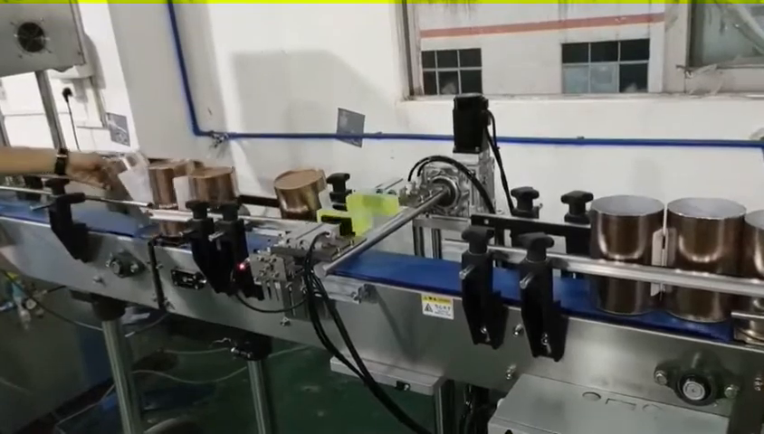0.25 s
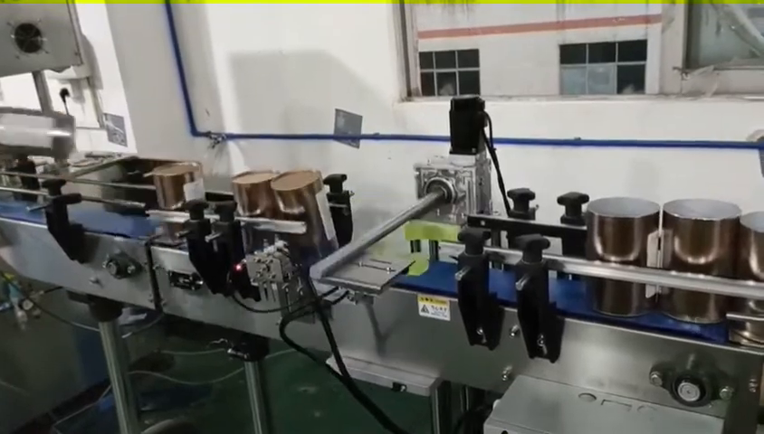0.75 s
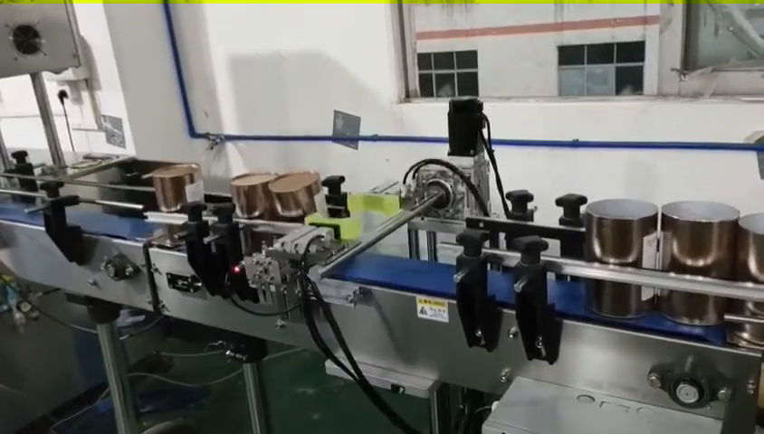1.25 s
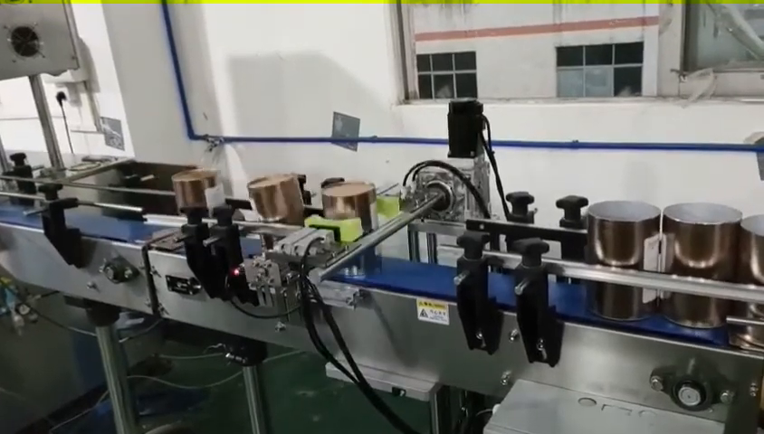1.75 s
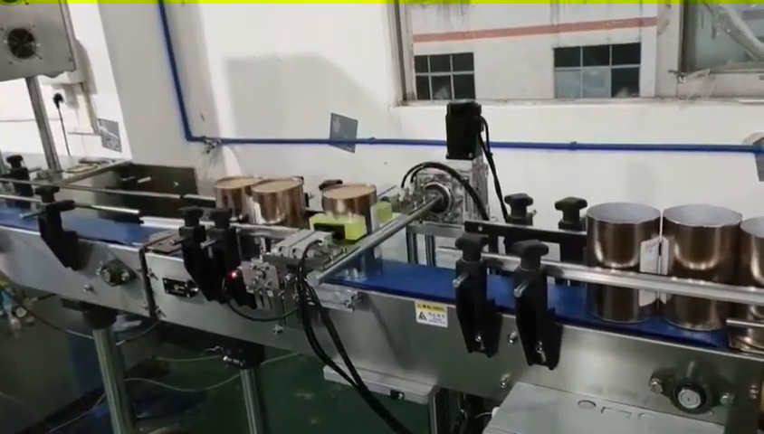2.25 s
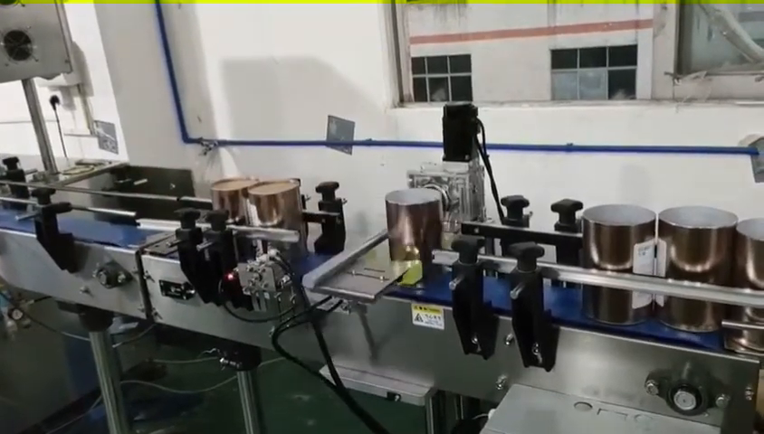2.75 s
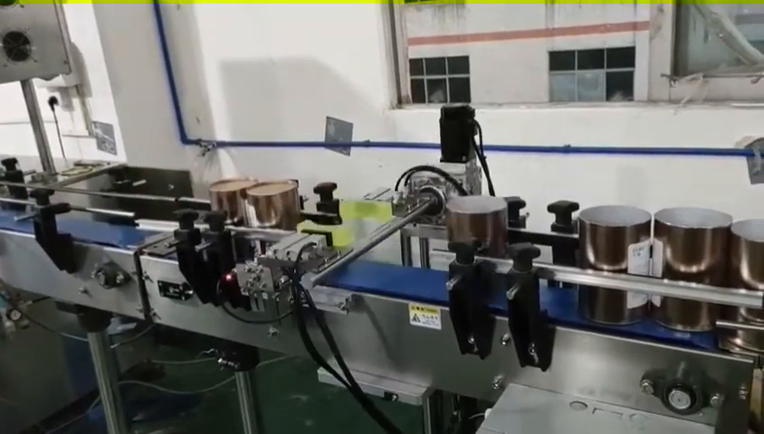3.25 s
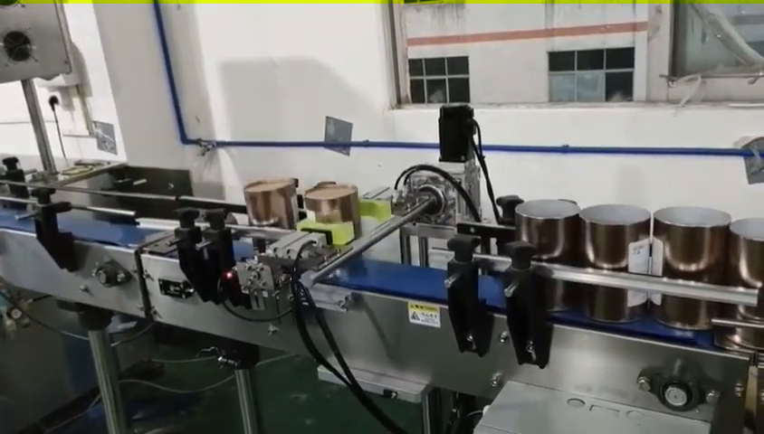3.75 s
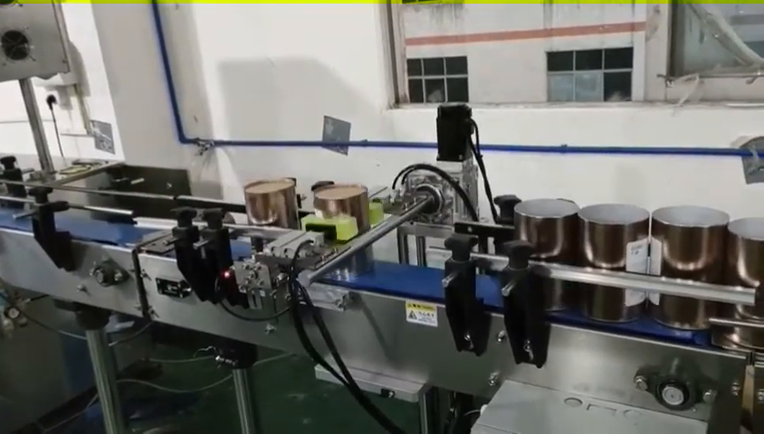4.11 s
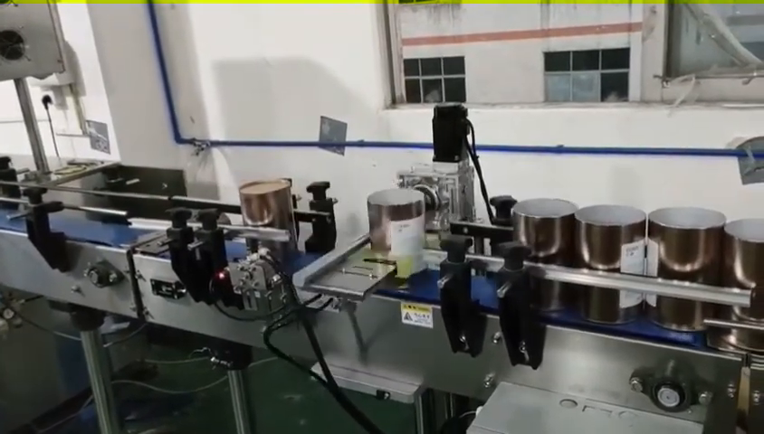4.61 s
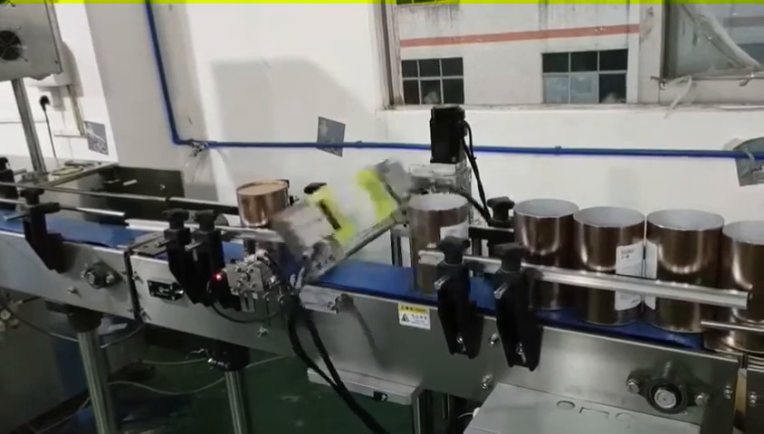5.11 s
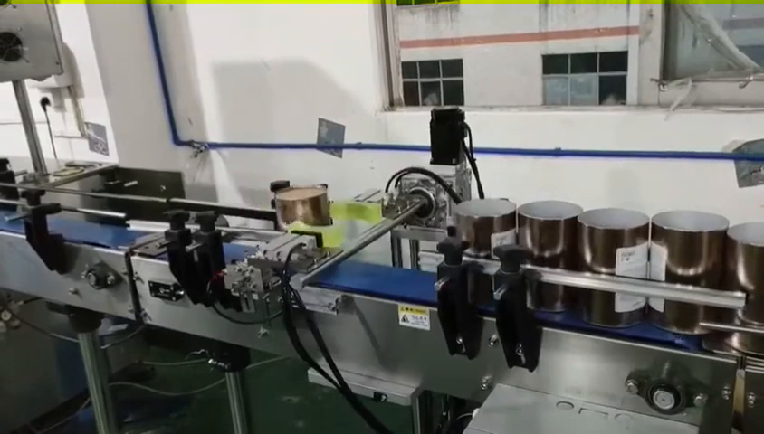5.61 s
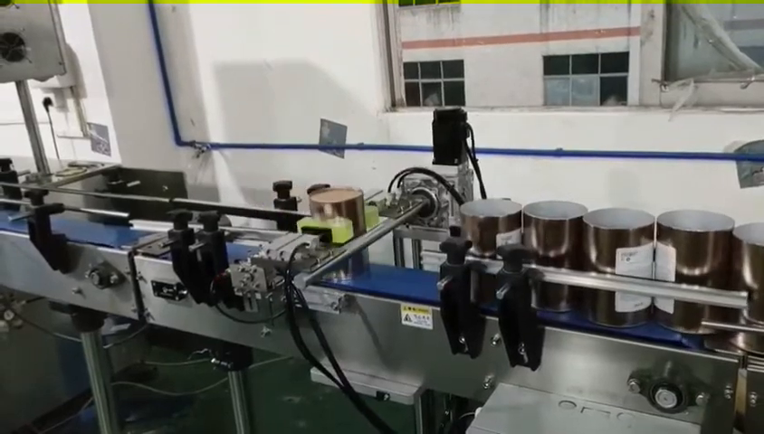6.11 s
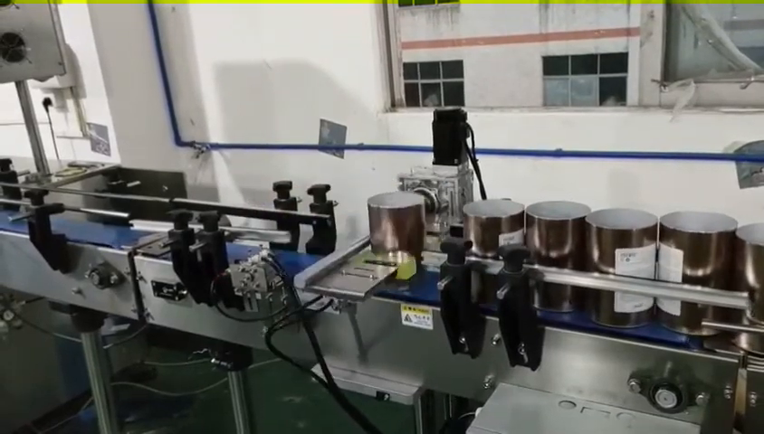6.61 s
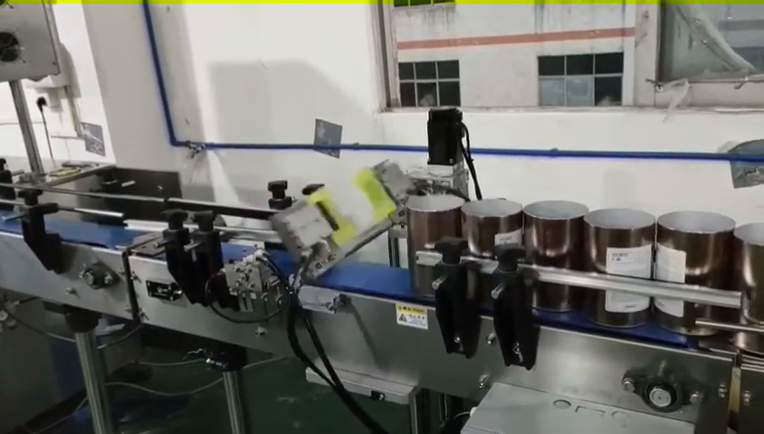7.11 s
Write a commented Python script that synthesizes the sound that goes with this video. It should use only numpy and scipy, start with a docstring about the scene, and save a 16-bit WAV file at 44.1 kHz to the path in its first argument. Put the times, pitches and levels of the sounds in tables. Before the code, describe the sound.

Sharp valve clacks, each trailing a quick hiss of air, repeat in a two-second pattern as a machine arm turns cans over on a conveyor. Between them come hollow thuds, tinny bumps of empty cans and a few faint scrapes and pings. Underneath, the cans drone and ring on the moving belt while distant machines hum. The sound is captured by a nearby phone in a slightly echoing factory hall.

```python
"""Turning cans on a factory conveyor

Empty cans shiver on the moving belt, droning and ringing. An arm thuds against its stops, and
cans land, bump and scrape. Four air valves take turns in a two-second cycle: each one clacks,
then lets out a hiss of air through a muffler. Behind it all, the hall hums and echoes.
A phone picks up the sound from a metre or two away."""
import sys
import numpy as np
from scipy import signal
from scipy.fft import rfft, irfft
from scipy.io import wavfile
from scipy.ndimage import uniform_filter1d

SR = 44100
rng = np.random.default_rng(int(sys.argv[2]) if len(sys.argv) > 2 else 0)


def wav_out(sig):
    """Save sig, one row per channel (or a flat mono array), as 16-bit PCM at SR to the path in sys.argv[1]."""
    wavfile.write(sys.argv[1], SR, np.round(np.clip(np.atleast_2d(sig).T, -1, 1) * 32767).astype(np.int16))


N = 324576

# Noise of distant machines. Each row: frequency in Hz, level in dB.
HALL_SPECTRUM = [(18, -81), (30, -41), (311, -2.5), (359, -4), (424, -4), (700, -16.5), (1030, -13),
                 (1130, -11.5), (1470, -17.5), (1950, -19), (2730, -13), (4200, -21.5), (5080, -25),
                 (5800, -27), (6500, -34.5), (7500, -41.5), (8600, -61), (11200, -71.5)]
# How much that noise flickers. Each row: frequency in Hz, typical swing in dB.
HALL_FLICKER = [(2000, 0.2), (5000, 1), (7500, 5), (10000, 6)]
# The hall's echo. Each row: frequency in Hz, fade time in seconds (the time to drop by 60 dB).
HALL_FADE = [(200, 0.44), (1500, 0.63), (5000, 0.63), (10000, 0.31)]
# Cans shivering on the belt. Each row: time in seconds, drone level in dB, wall ring level in dB.
SHIVER_LEVELS = [(0.0, -31, -47), (1.0, -32.5, -53), (2.0, -31.5, -45), (2.45, -32.5, -39.5),
                 (3.0, -31, -47.5), (3.65, -33.5, -44), (3.85, -27, -42), (4.0, -30, -44.5),
                 (4.6, -31.5, -48.5), (5.45, -28.5, -42), (5.62, -26.5, -38), (5.8, -30, -47.5),
                 (6.6, -29.5, -53), (6.76, -26.5, -47), (7.1, -33.5, -40), (7.3, -25.5, -46),
                 (7.36, -27, -49)]
# The notes of their drone. Each row: pitch in Hz, filter width in Hz, level in dB.
DRONE_NOTES = [(286, 27, -13.5), (343.6, 25, -2.5), (423.3, 34, 8), (471, 18.4, 2.5), (508.6, 33.5, 2.5)]
# Moments when the wall ring flares up. Each row: start in seconds, length in seconds, level in dB.
RING_FLARES = [(0.255, 0.13, -40), (0.413, 0.049, -38), (0.524, 0.047, -35), (0.66, 0.032, -41),
               (0.759, 0.03, -38), (0.847, 0.08, -35), (0.992, 0.056, -31), (1.12, 0.066, -42),
               (1.24, 0.036, -32), (1.4, 0.052, -33.5), (1.565, 0.042, -33), (1.71, 0.09, -37.5),
               (1.843, 0.04, -42), (2.12, 0.05, -45), (2.22, 0.099, -46), (2.41, 0.063, -36),
               (2.739, 0.024, -49), (3.507, 0.045, -37.5), (3.63, 0.045, -38), (3.812, 0.066, -28.5),
               (3.985, 0.061, -40), (4.18, 0.08, -38.5), (4.68, 0.03, -37), (4.74, 0.041, -37),
               (4.816, 0.026, -39), (4.878, 0.033, -34), (5.058, 0.04, -36), (5.182, 0.039, -37),
               (5.263, 0.04, -40), (5.394, 0.073, -48), (5.52, 0.18, -34), (5.737, 0.052, -44),
               (5.824, 0.075, -37), (6.015, 0.1, -33.5), (6.21, 0.11, -36.5), (6.37, 0.16, -36.5),
               (6.566, 0.042, -40), (6.633, 0.057, -35.5), (6.728, 0.22, -40), (7.005, 0.024, -47),
               (7.2, 0.075, -36), (7.27, 0.08, -33)]
# Rims scraping a rail. Each row: start in seconds, length in seconds, level in dB, pitch in Hz.
RIM_SCRAPES = [(1.2, .07, -47, 5900), (3.2, .05, -41, 5950), (.66, .05, -44, 4900)]
# Small metal pings. Each row: start in seconds, peak level in dB, pitch in Hz.
METAL_PINGS = [(0.667, -33, 4900), (1.848, -25, 6500), (5.6101, -34, 5660), (5.8466, -30, 5580)]
# Hollow thuds. Each row: start in seconds, peak level in dB, pitch in Hz.
HOLLOW_THUDS = [(0.045, -17.5, 444), (0.19, -18, 440), (0.251, -23.5, 436), (0.327, -14.5, 352),
                (0.385, -25, 415), (0.455, -28, 455), (0.62, -25, 450), (0.899, -15.5, 415),
                (1.005, -22, 420), (1.064, -21, 348), (1.249, -20.5, 420), (1.409, -17.5, 361),
                (1.5, -20, 412), (1.85, -20.5, 442), (1.878, -16.5, 397), (2.218, -17.5, 430),
                (2.302, -11, 371), (2.749, -14, 426), (2.775, -16, 421), (2.9, -19.5, 433),
                (2.92, -22, 434), (3.16, -21, 453), (3.2, -22.5, 440), (3.26, -21.5, 440),
                (3.419, -20.5, 424), (3.512, -19.5, 450), (3.818, -16.5, 450), (3.837, -16, 450),
                (3.875, -22, 440), (4.221, -23, 448), (4.299, -10, 341), (4.319, -15, 405),
                (4.593, -19.5, 427), (5.035, -22, 420), (5.144, -20.5, 417), (5.232, -22, 420),
                (5.36, -23.5, 441), (5.419, -17.5, 449), (5.569, -17, 420), (5.601, -19, 463),
                (5.892, -19.5, 474), (6.039, -15, 417), (6.217, -19, 367), (6.295, -10, 320),
                (6.609, -18, 415), (6.745, -14, 426), (6.925, -17.5, 413), (6.965, -14.5, 433),
                (7.08, -20, 445), (7.108, -17.5, 445), (7.198, -18, 447), (7.232, -21.5, 453),
                (7.315, -15.5, 465)]
# Cans landing and bumping. Each row: start in seconds, wall ring peak in dB, rim rattle level in dB.
CAN_BUMPS = [(0.062, -24, -32.5), (0.44, -35, -50), (0.527, -37, -50), (1.004, -35, -39), (1.241, -29, -36),
             (1.586, -30, -37), (1.845, -30, -29), (2.289, -24.5, -35), (2.334, -19.5, -31),
             (2.745, -19, -26.5), (2.779, -31, -32), (3.512, -28, -38), (3.813, -23, -29.5),
             (3.837, -18.5, -35), (3.866, -20, -53), (4.289, -22, -46), (4.745, -20.5, -27.5),
             (4.776, -41, -32.5), (5.563, -14, -28), (5.834, -24, -30), (6.004, -27, -43),
             (6.432, -28, -45), (6.743, -16, -27.5), (6.774, -21, -28), (6.79, -24, -35),
             (6.945, -20.5, -33), (7.201, -28, -35), (7.271, -15.5, -35.5), (7.286, -18.5, -34)]
# The notes of a struck can wall. Each row: pitch in Hz, level in dB, fade time in seconds.
WALL_NOTES = [(892, -7.5, 0.042), (1002, -6.5, 0.04), (1067, -2, 0.029), (1113, -11, 0.14),
              (1238, -6.5, 0.051), (1343, -6, 0.037), (1540, -8.5, 0.029), (1830, -14, 0.025)]
# The tinny rattle of rims. Each row: frequency in Hz, level in dB.
RATTLE_SPECTRUM = [(1500, -19.5), (2200, 0), (2750, -1), (3400, 3.5), (4200, -10.5), (5500, -4.5),
                   (7500, -26)]
# The frame's notes when a valve kicks it. Each row: pitch in Hz, level in dB, fade time in seconds.
FRAME_NOTES = [(121, -9.5, 0.058), (178.7, 3.5, 0.062), (252.4, 1.5, 0.096), (658, 11, 0.027),
               (815, 2.5, 0.026), (963, 2.5, 0.031)]
# The notes air stirs up in the muffler. Each row: pitch in Hz, base width in Hz, level in dB.
MUFFLER_NOTES = [(2750, 120, 2), (3090, 63, 1), (3450, 44, 0.5), (3740, 80, 3.5), (4130, 120, 0.5),
                 (4500, 110, 1.5), (5040, 170, 2), (5520, 51, 0), (5800, 91, 0.5), (6350, 54, -5.5),
                 (7120, 140, -8.5)]
# The body of an air jet, and its thin, high top. Each row: frequency in Hz, level in dB.
JET_SPECTRUM = [(1200, 0), (2000, -11.5), (2900, -4), (3800, -5), (5900, -8.5), (7000, -13.5)]
TOP_SPECTRUM = [(6500, -48), (7300, 0), (8000, -2.5), (8600, -8.5), (9600, 0.5), (10500, -10.5),
                (11200, -35.5)]
# The four valves in firing order. Each row: clack peak in dB, clack pitch in Hz, frame kick in dB,
# jet delay in seconds, jet level in dB, top level in dB, hold time in seconds, fade time in seconds,
# slam peak in dB, slam pitch in Hz, squeal peak in dB, squeal pitch in Hz,
# extra first rush as a multiple of the held level, seconds until the top starts to cut out.
VALVE_SETTINGS = [(-16, 1240, -25.5, 0.0014, -21.5, -39.5, 0.032, 0.29, -19, 480, -26.5, 2700, 0.46, 0.11),
                  (-10.5, 1577, -25, 0.00085, -23, -39, 0.029, 0.35, -17.5, 445, -26, 6900, .6, 0.093),
                  (-16, 1260, -27, 0.0017, -26, -41, 0.022, 0.3, -16, 520, -16, 6000, 1.6, 0.054),
                  (-12.5, 1480, -24.5, 0.0027, -27.5, -43.5, 0.025, 0.23, -22, 880, -18, 4000, 1.3, 0.11)]
# The valves firing in turn. Each row: start in seconds, dB added to that valve's levels.
VALVE_FIRINGS = [(0.2515, -0.5), (0.8095, 0), (1.4185, -2), (1.7525, 0.5), (2.2205, -1), (2.809, -0.5),
                 (3.4185, -2), (3.7515, 1), (4.2215, -1.5), (4.8115, -2), (5.4185, -2.5), (5.7505, 0.6),
                 (6.2185, -1.5), (6.81, -0.9)]


def undb(db):
    """Turn decibels into a number to multiply by."""
    return 10 ** (np.asarray(db) / 20)


def unit(x):
    """Scale a signal to an average (rms) level of 1."""
    return x / np.sqrt(np.mean(x ** 2))


def along(table, hz):
    """Read between a table's rows, spacing the frequencies by octaves."""
    frequencies, values = np.transpose(table)
    return np.interp(np.log(hz), np.log(frequencies), values)


def band(x, low_hz, high_hz):
    """Keep the sound between two frequencies."""
    return signal.sosfilt(signal.butter(2, [low_hz, high_hz], "bandpass", fs=SR, output="sos"), x)


def coloured(table):
    """Noise shaped by a spectrum table, dropping steeply past its ends."""
    hz = np.maximum(np.arange(N // 2 + 1) * SR / N, 1)
    octaves_out = np.maximum(np.log2(table[0][0] / hz), 0) + np.maximum(np.log2(hz / table[-1][0]), 0)
    return unit(irfft(rfft(rng.standard_normal(N)) * undb(along(table, hz) - 61 * octaves_out), N))


def wander(per_second):
    """A smooth random wobble with a typical size of 1."""
    step = int(SR / per_second)
    stairs = np.repeat(rng.standard_normal(N // step + 1), step)
    return unit(uniform_filter1d(uniform_filter1d(stairs, step), step)[:N])


def ticks(per_second, size=N):
    """Clicks of random strength at random times."""
    return (rng.random(size) < per_second / SR) * rng.standard_normal(size)


def resonate(x, hz, *widths_hz):
    """Bring out one pitch, filtering once for each width given."""
    for width in widths_hz:
        x = signal.lfilter(*signal.iirpeak(hz, hz / width, fs=SR), x)
    return x


def add(track, start, sound):
    """Mix a sound into a track, with its start in seconds."""
    i = int(start * SR)
    track[i:i + len(sound)] += sound[:N - i]


def ring(notes, rise_s):
    """One blow sets notes ringing. Each blow lands elsewhere, so their strengths vary."""
    t = np.arange(SR // 3) / SR
    chance = rng.standard_normal((len(notes), 2))
    sound = sum(undb(db + 3 * louder - 60 * t / fade_s) * np.sin(2 * np.pi * hz * (1 + detune / 200) * t)
                for (hz, db, fade_s), (louder, detune) in zip(notes, chance))
    sound *= 1 - np.exp(-t / rise_s)  # a soft contact rises slowly
    return sound / np.abs(sound).max()


def chatter(sound, fade_s):
    """A loose part bounces, repeating the blow in quick taps that die away."""
    t = np.arange(SR // 6) / SR
    taps = ticks(900, len(t)) * undb(-60 * t / fade_s)
    taps[0] = 3.5  # the first hit
    bounces = signal.fftconvolve(taps, sound[:SR // 8])
    return bounces / np.abs(bounces).max()


def hall_noise():
    """Distant machines: each half-octave of noise flickers on its own, the treble most."""
    spectrum, out = rfft(coloured(HALL_SPECTRUM)), 0
    hz = np.maximum(np.arange(N // 2 + 1) * SR / N, 1)
    for centre in 30 * 2 ** np.arange(0, 9, .5):
        share = np.cos(np.pi * np.clip(np.log2(hz / centre), -.5, .5)) ** 2
        flicker = undb(1.5 * wander(10) + along(HALL_FLICKER, centre) * wander(35))
        out = out + irfft(spectrum * share, N) * flicker
    hiss_level = np.sqrt(np.mean(band(out, 1800, 5000) ** 2))
    return out / hiss_level * undb(-35.5)


def echo(x, echo_db):
    """The hall rings on after a sound, longest in the middle pitches."""
    t = np.arange(SR) / SR
    tail = sum(band(rng.standard_normal(SR), hz / 2 ** .5, hz * 2 ** .5)
               * undb(-60 * t / along(HALL_FADE, hz)) for hz in 125 * 2. ** np.arange(7))
    tail *= 1 - np.exp(-t / .0049)
    return x + undb(echo_db) * signal.fftconvolve(x, tail / np.linalg.norm(tail))[:N]


def mains_hum(hz=100.1):
    """The electric supply hums on one low, slightly wavering note."""
    return unit(np.sin(2 * np.pi * hz * np.arange(N) / SR)) * undb(-57 + wander(7.6))


def shivering_cans(wall_hz=1131):
    """The belt shakes the cans, so they drone and their thin walls ring."""
    times, *levels = np.transpose(SHIVER_LEVELS)
    drone_db, wall_db = [np.interp(np.arange(N) / SR, times, db) for db in levels]
    push = .81 * unit(ticks(40)) + rng.standard_normal(N)  # jolts from belt joints, plus steady rubbing
    drone = sum(undb(db + 1.3 * wander(7)) * unit(resonate(push, hz, width, width)) * (-1) ** k
                for k, (hz, width, db) in enumerate(DRONE_NOTES))
    throb = undb(drone_db + 1.2 * wander(22))
    tone = np.sin(2 * np.pi * np.cumsum(wall_hz * (1 + .0039 * wander(12))) / SR)
    wall = unit(tone + .47 * unit(resonate(push, wall_hz, 45, 45)))
    flares = np.zeros(N)
    for start, length, db in RING_FLARES:
        add(flares, start, np.full(int(length * SR), undb(db)))
    flares = uniform_filter1d(flares, int(.025 * SR)) * undb(.71 * wander(30))  # soft edges, uneven level
    shiver = undb(wall_db + .5 * wander(15))
    return unit(drone) * throb + wall * (shiver + flares)


def scrapes(width_hz=500):
    """A rim drags briefly along a guide rail, hissing around one pitch."""
    out = np.zeros(N)
    for start, length, db, hz in RIM_SCRAPES:
        rub = resonate(rng.standard_normal(int(length * SR)), hz, width_hz, width_hz)
        add(out, start, undb(db) * unit(rub) * np.hanning(len(rub)))
    return out


def pings(fade_s=.035):
    """Metal pings on two high notes that lie close together."""
    out = np.zeros(N)
    for start, db, hz in METAL_PINGS:
        add(out, start, undb(db) * ring([(hz, 0, fade_s), (1.012 * hz, -3, fade_s)], rise_s=.003))
    return out


def thuds(fade_s=.051):
    """Soft blows, like the arm meeting its stops, sound in the hollows of frame and cans."""
    out = np.zeros(N)
    for start, db, hz in HOLLOW_THUDS:
        notes = [(.9925 * hz, 1, fade_s), (.869 * hz, -13, fade_s), (1.234 * hz, -11.5, fade_s)]
        add(out, start, undb(db) * ring(notes, rise_s=.0035))
    return out


def can_bumps(rattle_rise_s=.0021, rattle_fade_s=.32):
    """Cans land and bump: their walls ring and their rims rattle unevenly."""
    walls, shake = np.zeros((2, N))
    t = np.arange(SR // 4) / SR
    rise = 1 - np.exp(-(t / rattle_rise_s) ** 2)
    for start, wall_db, rattle_db in CAN_BUMPS:
        add(walls, start, undb(wall_db) * chatter(ring(WALL_NOTES, rise_s=.0015), fade_s=.05))
        add(shake, start, rise * undb(rattle_db - 60 * t / rattle_fade_s))
    return walls + shake * undb(2.2 * wander(250)) * coloured(RATTLE_SPECTRUM)


def valve_clacks():
    """Each valve clacks, squeals as it opens and kicks the frame."""
    out = np.zeros(N)
    for k, (start, db) in enumerate(VALVE_FIRINGS):
        valve = VALVE_SETTINGS[k % 4]
        clack_db, hz, kick_db = valve[:3]
        slam_db, slam_hz, squeal_db, squeal_hz = valve[8:12]
        clack = ring([(hz, 0, .013), (.62 * hz, -7, .015), (.8 * hz, -3, .015), (1.3 * hz, -3, .015),
                      (1.7 * hz, -5, .012), (2.4 * hz, -6, .01)], rise_s=.0016)
        add(out, start, undb(clack_db + db) * chatter(clack, fade_s=.045))
        # The sliding part inside slams into its end stop and bounces once.
        for bounce_s, bounce_db in ((0, 0), (.017, -3)):
            slam = ring([(slam_hz, 0, .014)], rise_s=.0004)
            add(out, start + .00183 + bounce_s, undb(slam_db + db + bounce_db) * slam)
        squeal = ring([(squeal_hz, 0, .01), (.93 * squeal_hz, -2, .01), (.88 * squeal_hz, -2, .01)],
                      rise_s=.00072)
        add(out, start + .0032, undb(squeal_db + db) * chatter(squeal, fade_s=.047))
        add(out, start, undb(kick_db + db) * ring(FRAME_NOTES, rise_s=.0033))
    return out


def muffler_hiss():
    """Air rushes through the muffler. Oil mist makes it gritty, and single droplets snap."""
    gas = rng.standard_normal(N) * undb(np.minimum(4 * rng.exponential(size=N), 18))
    pipe = sum(undb(db + 4.8 * wander(35)) * unit(resonate(gas, hz, 4 * width, 1.7 * width)) * (-1) ** k
               for k, (hz, width, db) in enumerate(MUFFLER_NOTES))
    droplets = band(band(ticks(1500), 2000, 6000), 1500, 6500)
    return unit(coloured(JET_SPECTRUM) + undb(-2) * unit(pipe) + undb(-6) * unit(droplets))


def air_jets(body_rise_s=.003, top_rise_s=.007, rush_s=.017, top_cut_s=.092):
    """Each jet rises, holds while the pressure lasts, then fades. Gives its body and top separately."""
    body, top = np.zeros((2, N))
    t = np.arange(SR // 2) / SR
    body_rise = 1 - np.exp(-(t / body_rise_s) ** 3)
    top_rise = 1 - np.exp(-(t / top_rise_s) ** 3)
    for k, (start, db) in enumerate(VALVE_FIRINGS):
        valve = VALVE_SETTINGS[k % 4]
        delay, jet_db, top_db, hold_s, fade_s = valve[3:8]
        rush, top_stop_s = valve[12:]
        blast = (1 + rush * np.exp(-t / rush_s)) * undb(db)  # the first rush is the hardest
        fade = np.maximum(t - hold_s, 0) / fade_s
        cut = np.maximum(t - top_stop_s, 0) / top_cut_s  # the top dies first as the pressure runs out
        add(body, start + delay, blast * body_rise * undb(jet_db - 60 * fade))
        add(top, start + delay, blast * top_rise * undb(top_db - 59 * fade - 60 * cut))
    flutter = undb(.72 * wander(150) + .7 * wander(60))  # swirling air is uneven
    sputter = undb(3.5 * wander(45))  # the thin top of the jet breaks up
    return flutter * body * muffler_hiss(), flutter * sputter * top * coloured(TOP_SPECTRUM)


def scene():
    """Mix the steady background with the echoing knocks and valves, in one channel."""
    background = hall_noise() + mains_hum() + shivering_cans()
    knocks = echo(scrapes() + pings() + thuds() + can_bumps(), echo_db=-11)
    jet_body, jet_top = air_jets()
    valves = echo(valve_clacks() + jet_body, echo_db=-8.5) + echo(jet_top, echo_db=-24)
    return (background + knocks + valves)[None]


def record(dry, low_hz=44.6, top_hz=11310):
    """The phone drops the deep bass, rounds off the loudest peaks and cuts the highest treble."""
    thin = signal.sosfilt(signal.butter(2, low_hz, "highpass", fs=SR, output="sos"), dry)
    rounded = np.tanh(1.2 * thin) / 1.2
    return signal.sosfilt(signal.ellip(8, .2, 70, top_hz, fs=SR, output="sos"), rounded)


dry = scene()
out = record(dry)
wav_out(out)
```